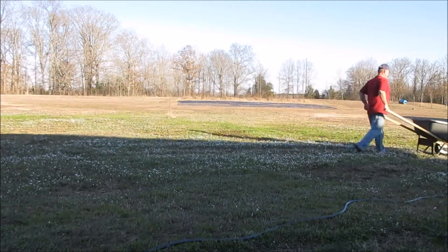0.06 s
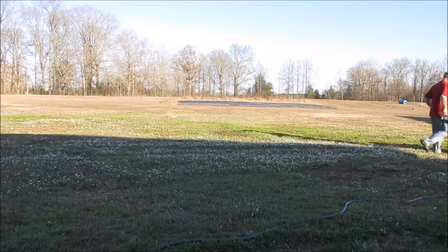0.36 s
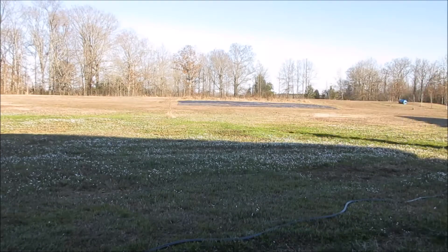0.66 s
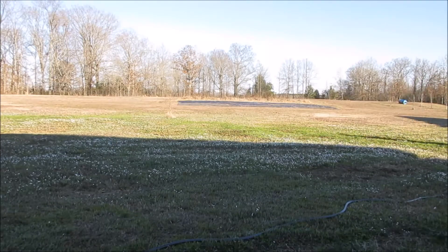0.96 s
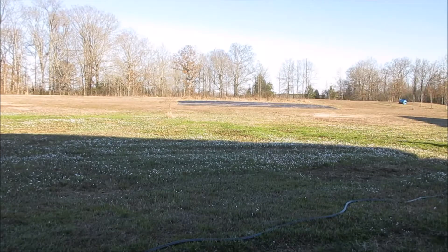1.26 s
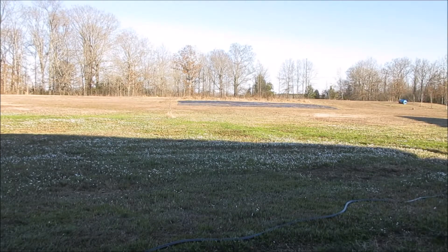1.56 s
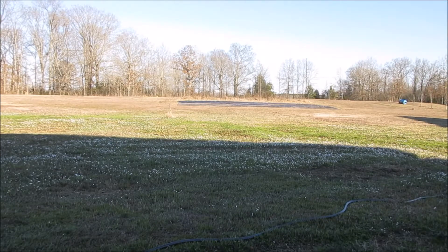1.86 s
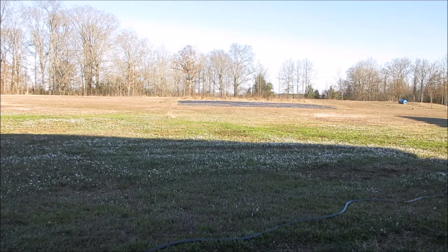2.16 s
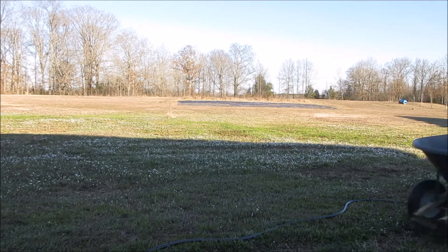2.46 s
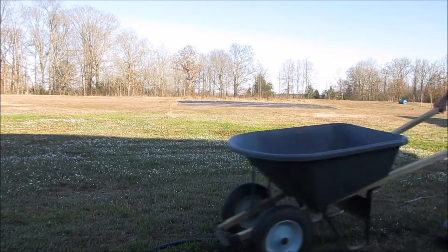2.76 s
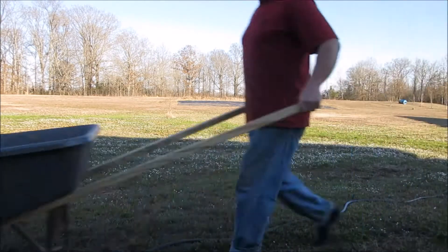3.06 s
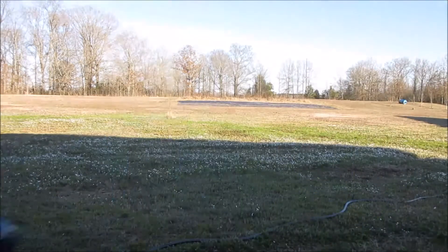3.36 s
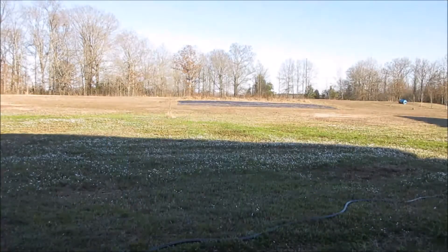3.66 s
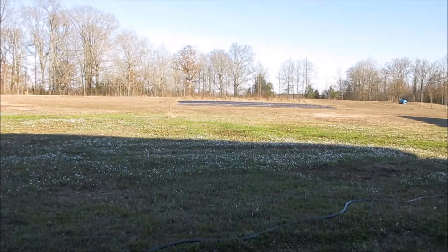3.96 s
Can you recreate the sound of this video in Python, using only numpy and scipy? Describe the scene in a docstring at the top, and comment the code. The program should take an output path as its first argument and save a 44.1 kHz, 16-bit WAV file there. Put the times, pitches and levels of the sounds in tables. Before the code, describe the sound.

A wheelbarrow crosses an open grassy field, starting with light, distant clinks. As it nears the microphone, the plastic tub knocks hollowly, the fittings clatter and the tyres rumble and crunch through the grass. A faint steady hiss lies underneath.

```python
"""A two-wheeled barrow with a plastic tub rattles over a bumpy lawn, first far off, then close by.
Each jolt makes its loose metal fittings clink and ring the tub; a few also draw a wooden clonk from
the handles. Close by, bumps knock dully on the tub, and the tyres rumble over the turf, crackle
through the grass and squeak on it. Under it all lie a faint steady hiss and, briefly, a far hum."""
import sys
import numpy as np
from scipy import signal
from scipy.fft import rfft, irfft
from scipy.io import wavfile

SR = 44100
rng = np.random.default_rng(int(sys.argv[2]) if len(sys.argv) > 2 else 0)


def to_wav(s):
    """Save 16-bit WAV."""
    ch = np.atleast_2d(s).T  # columns
    pcm = np.round(np.clip(ch, -1, 1) * 32767)  # PCM
    wavfile.write(sys.argv[1], SR, pcm.astype(np.int16))


N = 176400
TOP_HZ, TUB_BAND_HZ = 15750, (230, 3160)

# Jolts of the fittings. Each row: start in seconds, relative clink level in dB, relative tub level in dB.
JOLTS = [(0.0385, -29, -40), (0.1745, -17.5, -36), (0.1874, -24, -41.5), (0.2302, -29.5, -46.5),
         (0.5208, -32, -40.5), (0.5444, -39.5, -44.5), (0.5834, -28.5, -38), (0.7559, -36, -40.5),
         (0.7898, -37, -44), (0.8054, -44, -44.5), (0.9253, -35.5, -44), (0.989, -43.5, -44.5),
         (1.3485, -34.5, -41), (1.3984, -34.5, -41), (1.5577, -33, -40.5), (1.7973, -31.5, -44),
         (1.8306, -36, -42), (1.8844, -29, -47), (1.927, -28.5, -36), (1.9456, -31, -41.5),
         (2.0102, -27.5, -30), (2.0167, -20.5, -35), (2.0307, -24, -34.5), (2.144, -28, -38),
         (2.1662, -26.5, -37), (2.2914, -28, -38), (2.3213, -25.5, -35.5), (2.3455, -26, -40),
         (2.3919, -21, -35), (2.4064, -28, -45), (2.4241, -25, -38.5), (2.4954, -15, -31),
         (2.6304, -23.5, -37.5), (2.6832, -24, -41.5), (2.829, -26, -39.5), (2.915, -24, -32.5),
         (2.9261, -16, -28.5), (2.9381, -18.5, -33), (2.9496, -13, -25.5), (2.9549, -33, -23.5),
         (2.9871, -17, -30), (3.0289, -23, -35.5), (3.0464, -25.5, -34), (3.081, -21.5, -26.5),
         (3.1197, -31, -33.5), (3.2071, -30.5, -34.5), (3.24, -25, -29.5), (3.3687, -22.5, -34.5),
         (3.4298, -17.5, -30), (3.5507, -29.5, -40), (3.5898, -30.5, -34), (3.6023, -20, -32),
         (3.7019, -22.5, -37), (3.8713, -28, -38), (3.931, -30.5, -40)]
# The clink's bright EQ. Each row: frequency in Hz, relative gain in dB.
CLINK_EQ = [(300, -58), (1800, -1.5), (2800, 1), (3500, 4.5), (5000, 2), (7800, -0.5), (10000, 3),
            (14000, 1), (16000, -5.5)]
# Fine chatter that keeps the tub sounding. Each row: time in seconds, drive level in dB.
CHATTER_LEVELS = [(0, -56), (.4, -53.5), (.7, -65.5), (.83, -56.5), (.9, -56.5), (1.25, -73.5),
                  (1.5, -58.5), (1.7, -62.5), (1.85, -42), (1.95, -46), (2.1, -60), (2.35, -52), (2.8, -51),
                  (3.0, -46.5), (3.3, -45), (3.5, -51), (3.8, -54), (4, -57)]
def rattles(bands=56, patchy_db=5, rise_s=0.001, crack_s=0.0022, tail_s=0.011):
    """Each jolt sets the fittings chattering: a bright clink and a shudder that rings the tub."""
    t = np.arange(SR // 5) / SR
    clinks, push, far = np.zeros(N), np.zeros(N), farness()
    attack = 1 - np.exp(-t / rise_s)
    crack, tail = np.exp(-t / crack_s), undb(-6) * np.exp(-t / tail_s)
    duller = signal.butter(1, 4870, fs=SR, output="sos")
    band_hz = np.geomspace(1500, TOP_HZ, bands)
    for start, clink_db, tub_db in JOLTS:
        contacts, sizes, shudder = rng.standard_normal((3, len(t)))
        contacts = unit(contacts * undb(5 * np.clip(sizes, -1, 1)))
        chatter = attack * (crack * contacts + tail * signal.sosfilt(duller, contacts))
        # every clink gets resonances of its own
        resonances = np.column_stack([band_hz, patchy_db * rng.standard_normal(bands)])
        add(clinks, start, undb(clink_db - 7.5) * colour(chatter, resonances))
        # from afar the shudder starts softer and lasts longer
        away = far[int(start * SR)]
        swell = np.sqrt(1 - np.exp(-t / (rise_s + 0.0024 * away)))
        decay = np.exp(-t / (0.015 + 0.007 * away))
        add(push, start, undb(tub_db + 2) * swell * decay * shudder)
    push += curve(CHATTER_LEVELS) * grains(per_s=340, spread_db=3)
    return over_lawn(colour(clinks, CLINK_EQ)) + tub(push)


# The tub's clear modes. Each row: pitch in Hz, relative level in dB, seconds to fade by 60 dB.
TUB_MODES = [(373.2, -3.5, 0.24), (485, -1.5, 0.17), (562.5, -3, 0.23), (668, -2, 0.084),
             (740.8, 4.5, 0.11), (818, -3.5, 0.046), (939, -16, 0.14), (1118, -8.5, 0.24),
             (1341, -7.5, 0.23), (1482, 1.5, 0.023), (1682, -7, 0.024), (2270, -16, 0.13),
             (2520, -4, 0.027)]
# Dense short resonances of tub and frame. Each row: frequency in Hz, relative gain in dB.
TUB_BODY_EQ = [(70, -56), (250, -1), (500, 0.5), (900, 3), (1600, -4), (2400, -5.5), (2800, -16.5),
               (3400, -13), (6000, -43), (16000, -62)]
def tub(push, vary_db=3, shifts_per_s=12, far_ring_db=6):
    """The tub rings in clear modes over a dense body; their strengths shift with the place struck."""
    t = np.arange(SR // 2) / SR
    rings = []
    for hz, db, t60 in TUB_MODES:
        tone = np.sin(2 * np.pi * (hz * t + rng.random()))
        rings.append(undb(db) / np.sqrt(t60) * tone * np.exp(-np.log(1000) * t / t60))
    rings = tub_band(np.array(rings))
    times = np.arange(0, N / SR, 1 / shifts_per_s)
    ringing = np.zeros(N)
    for ring in rings / np.linalg.norm(rings):
        drift_db = vary_db * np.clip(rng.standard_normal(len(times)), -1, 1)
        strength = curve(np.column_stack([times, drift_db]))
        ringing += signal.fftconvolve(push * strength, ring)[:N]
    ring_mix = undb(-2 + far_ring_db * farness())  # the ringing stands out from afar
    return (colour(push, TUB_BODY_EQ) + ring_mix * ringing) / np.hypot(1, ring_mix)


def tub_band(x):
    """The tub carries the mids and rolls off bass and treble."""
    return signal.sosfilt(signal.butter(2, TUB_BAND_HZ, "band", fs=SR, output="sos"), x)


def farness(arrival_s=2.4, approach_s=2.1):
    """1 while the barrow is far off, falling to 0 as it arrives."""
    return np.clip((arrival_s - np.arange(N) / SR) / approach_s, 0, 1)


def over_lawn(x, dip_hz=3700, dip_db=-15):
    """The lawn scoops out the low treble, most deeply when the barrow is far off."""
    band = signal.butter(1, [dip_hz / 3, dip_hz * 2], "band", fs=SR, output="sos")
    depth = 1 - undb(dip_db * farness() ** 2)
    return x - depth * signal.sosfiltfilt(band, x)


# Bumps that knock the tub. Each row: time in seconds, relative level in dB, rough pitch in Hz.
BUMPS = [(1.046, -32, 1320), (2.301, -18.5, 400), (2.306, -17, 840), (2.314, -22, 463), (2.435, -13.5, 734),
         (2.438, -23, 623), (2.506, -18.5, 754), (2.539, -22, 495), (2.546, -23, 483), (2.581, -15.5, 550),
         (2.587, -14, 690), (2.751, -29.5, 334), (2.873, -24, 700), (2.935, -19, 534), (2.956, -11.5, 1080),
         (2.964, -9, 655), (2.972, -14, 775), (2.975, -10, 860), (2.994, -11.5, 1050), (3.009, -29, 450),
         (3.027, -19.5, 490), (3.056, -18.5, 513), (3.066, -16.5, 770), (3.145, -13, 1230),
         (3.161, -18.5, 686), (3.201, -21, 650), (3.210, -12, 565), (3.216, -9, 1000), (3.232, -7.5, 546),
         (3.242, -19, 800), (3.410, -20.5, 706), (3.471, -19.5, 694), (3.475, -15, 540), (3.608, -9, 800),
         (3.613, -10, 483), (3.660, -16, 940), (3.674, -20, 487), (3.730, -14, 710), (3.791, -18, 513),
         (3.798, -8, 1090), (3.811, -13, 570), (3.828, -14.5, 1050)]
def knocks(judders=5, judder_db=-18, spread_s=0.005, lead_s=0.01):
    """Each bump gives a dull knock amid a judder of weaker, mostly lower ones."""
    out = np.zeros(N)
    for time, db, hz in BUMPS:
        start = time - lead_s
        add(out, start, undb(db - 4) * knock(hz, lead_s))
        for offset, size, pitch in rng.standard_normal((judders, 3)):
            gain = undb(db + judder_db) * np.clip(size, -2, 2)
            judder_hz = 0.78 * hz * np.exp(0.39 * np.clip(pitch, -1, 2))
            add(out, start + spread_s * offset, gain * knock(judder_hz, lead_s))
    return out


def knock(hz, lead_s, damping=0.76, ring_ratio=0.62):
    """A soft push, centred lead_s in, on a heavily damped panel: about one cycle, peak 1."""
    t = np.arange(SR // 25) / SR - lead_s
    push = np.exp(-.5 * (2 * np.pi * hz * t) ** 2)
    s = 1j * np.fft.rfftfreq(len(t), 1 / SR) / (hz * ring_ratio)
    panel = s * s / (s * s + damping * s + 1)  # resonant high-pass
    thud = irfft(rfft(push) * panel, len(t))
    return thud / np.abs(thud).max()


# Clonks of the handles. Each row: start in seconds, relative level in dB, pitch in Hz.
HANDLE_CLONKS = [(0.197, -32, 740), (0.759, -33.5, 984), (2.017, -25, 920)]
def clonks(decay_s=0.0072):
    """On a few jolts the handles add a short wooden note, sounding through the tub."""
    t, out = np.arange(SR // 8) / SR, np.zeros(N)
    for start, db, hz in HANDLE_CLONKS:
        add(out, start, undb(db) * np.sin(2 * np.pi * hz * t) * np.exp(-t / decay_s))
    return tub_band(out)


# Swells of the tyre rumble. Each row: time in seconds, level in dB.
RUMBLE_LEVELS = [(2.25, -67), (2.31, -41), (2.47, -53.5), (2.55, -41.5), (2.68, -55), (2.9, -47.5),
                 (2.97, -37), (3.12, -40.5), (3.19, -41), (3.25, -33.5), (3.35, -42.5), (3.52, -43),
                 (3.62, -34.5), (3.7, -50), (3.81, -36.5), (3.86, -54.5)]
# The rumble's dark EQ. Each row: frequency in Hz, relative gain in dB.
RUMBLE_EQ = [(25, -13), (60, 0), (120, 6), (300, 11), (500, 0.5), (900, -9.5), (1800, -30), (4000, -32.5)]
def tyres():
    """The tyres patter over lumps of turf, blurring into a low rumble."""
    return colour(grains(per_s=260, spread_db=5), RUMBLE_EQ) * curve(RUMBLE_LEVELS)


# The fader ride on the grass crackle. Each row: time in seconds, gain in dB.
GRASS_LEVELS = [(0, -63.5), (1.2, -67.5), (1.7, -65.5), (1.9, -58), (2.2, -62), (2.85, -55), (3.3, -53.5),
                (3.6, -60.5), (4, -64)]
# The rustle's airy EQ. Each row: frequency in Hz, relative gain in dB.
RUSTLE_EQ = [(800, -12), (2000, -0.5), (3500, 6.5), (7000, -1.5), (11500, 1), (16000, -3)]
def grass(count=600, low_hz=4200, high_hz=15100, decay_cycles=5):
    """Grass crushed under the tyres: many tiny dry ticks over a soft rustle."""
    t, ticks = np.arange(SR // 50) / SR, np.zeros(N)
    for when, pitch, size in rng.random((count, 3)):
        hz = low_hz + pitch * (high_hz - low_hz)
        tick = np.sin(2 * np.pi * hz * t) * np.exp(-t * hz / decay_cycles)
        add(ticks, when * N / SR, undb(5 + 14 * size ** 3) * tick)  # mostly small, a few loud
    rustle = colour(rng.standard_normal(N), RUSTLE_EQ)
    return (ticks + rustle) * curve(GRASS_LEVELS)


# Dry stalks snapping. Each row: start in seconds, peak level in dB, pitch in Hz.
STALK_SNAPS = [(2.926, -21, 6940), (2.94, -33, 8900), (2.976, -23, 13000), (3.316, -26, 14000),
               (3.527, -25.5, 14100)]
def snaps(decay_s=0.0016, relative_width=0.49):
    """Each stalk breaks with a few milliseconds of crackle around one pitch."""
    t, out = np.arange(SR // 40) / SR, np.zeros(N)
    for start, db, hz in STALK_SNAPS:
        burst = rng.standard_normal(len(t)) * np.exp(-t / decay_s)
        snap = signal.lfilter(*signal.iirpeak(hz, 1 / relative_width, fs=SR), burst)
        add(out, start, undb(db) * snap / np.abs(snap).max())
    return out


# Tyre squeaks. Each row: centre time in seconds, peak level in dB, pitch in Hz.
TYRE_SQUEAKS = [(2.722, -34.5, 2560), (3.334, -40.5, 5060), (3.745, -38.5, 2770)]
def squeaks(swell_s=0.0057, width_hz=350):
    """Rubber slips on a blade of grass: a brief, rough whistle."""
    t, out = np.arange(SR // 20) / SR, np.zeros(N)
    middle = t.mean()
    for time, db, hz in TYRE_SQUEAKS:
        whistle = signal.lfilter(*signal.iirpeak(hz, hz / width_hz, fs=SR), rng.standard_normal(len(t)))
        whistle *= np.exp(-.5 * ((t - middle) / swell_s) ** 2)
        add(out, time - middle, undb(db) * whistle / np.abs(whistle).max())
    return out


# The EQ of the hiss bed. Each row: frequency in Hz, relative gain in dB.
HISS_EQ = [(25, -30), (55, -35), (85, -19), (130, -11.5), (250, 1), (700, 0), (1500, -8), (2800, -6.5),
           (3900, -2), (5200, -9), (5900, 1.5), (6500, 3), (7200, -14.5), (11000, -21), (16000, -17)]
def hiss(level_db=-57):
    """A faint, steady bed of shaped noise."""
    return undb(level_db) * colour(rng.standard_normal(N), HISS_EQ)


# The swell of the far hum. Each row: time in seconds, level in dB.
HUM_LEVELS = [(1.1, -85), (1.3, -63), (1.7, -62.5), (1.9, -82)]
def hum(hz=347):
    """A faint, far pure tone that comes and goes."""
    return curve(HUM_LEVELS) * np.sqrt(2) * np.sin(2 * np.pi * hz * np.arange(N) / SR)


def undb(db):
    """Decibels to gain."""
    return 10 ** (np.asarray(db) / 20)


def unit(x):
    """Scale to rms 1."""
    return x / np.sqrt(np.mean(x ** 2) + 1e-20)


def curve(rows):
    """A gain envelope from rows of seconds and dB."""
    return undb(np.interp(np.arange(N) / SR, *np.array(rows).T))


def colour(x, eq, size=4096):
    """A minimum-phase EQ of unit energy, drawn through rows of Hz and dB."""
    hz, db = np.array(eq).T
    gain = undb(np.interp(np.log(np.fft.rfftfreq(size, 1 / SR) + 1), np.log(hz), db))
    cepstrum = irfft(np.log(gain))
    cepstrum[1:size // 2] *= 2
    cepstrum[size // 2 + 1:] = 0
    response = irfft(np.exp(rfft(cepstrum)))
    return signal.fftconvolve(x, response / np.linalg.norm(response))[:len(x)]


def add(track, start_s, sound):
    """Mix a sound into the track at a time."""
    i = max(int(start_s * SR), 0)
    track[i:i + len(sound)] += sound[:max(N - i, 0)]


def grains(per_s, spread_db):
    """Random tiny impacts of uneven size, rms 1."""
    hits = rng.random(N) < per_s / SR
    signs = np.sign(rng.standard_normal(N))
    sizes = undb(spread_db * np.clip(rng.standard_normal(N), -2, 2))
    return unit(hits * signs * sizes)


def scene():
    """The barrow crosses the quiet lawn, in mono."""
    barrow = rattles() + knocks() + clonks()
    rolling = tyres() + grass() + snaps() + squeaks()
    return (barrow + rolling + hiss() + hum())[None]


def record(dry):
    """Master EQ: thin the deepest bass and cut the top steeply."""
    thinned = signal.sosfilt(signal.butter(1, 45, "high", fs=SR, output="sos"), dry)
    return signal.sosfilt(signal.ellip(10, .2, 70, TOP_HZ, fs=SR, output="sos"), thinned)


dry = scene()
out = record(dry)
to_wav(out)
```